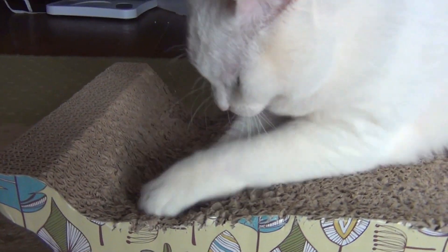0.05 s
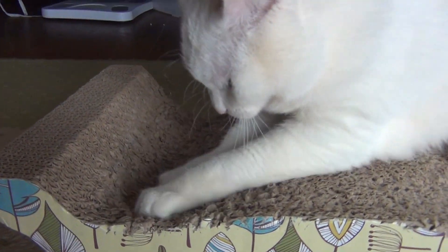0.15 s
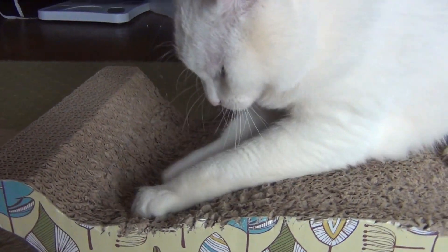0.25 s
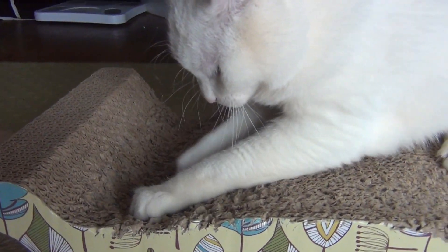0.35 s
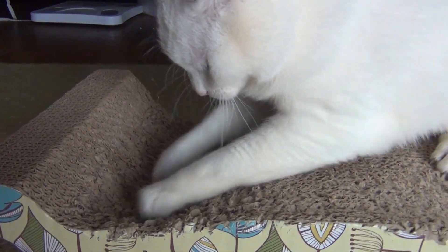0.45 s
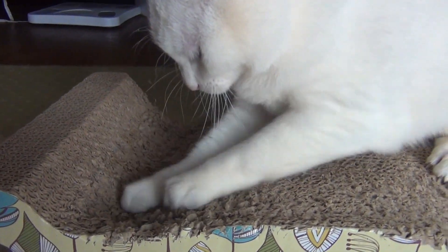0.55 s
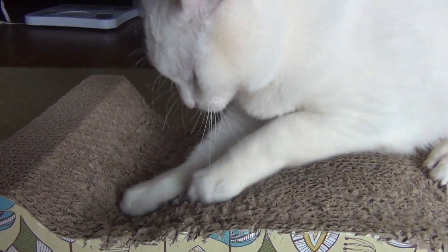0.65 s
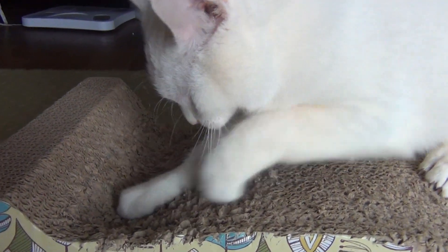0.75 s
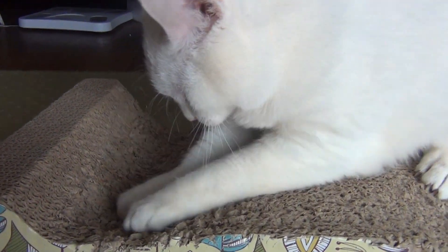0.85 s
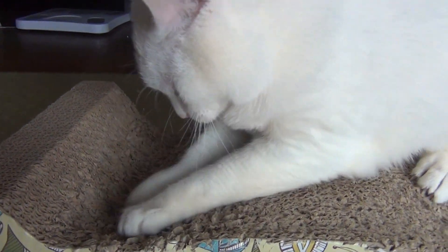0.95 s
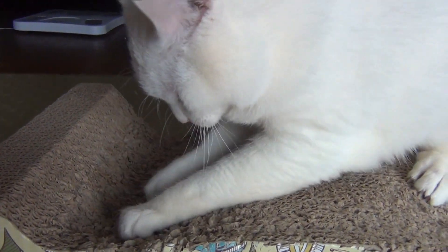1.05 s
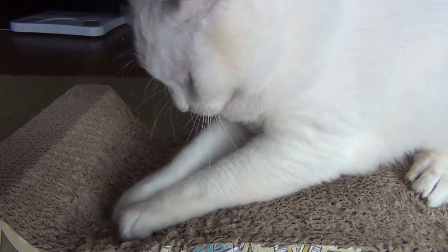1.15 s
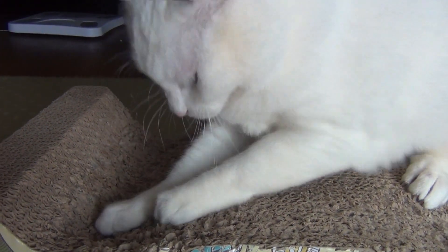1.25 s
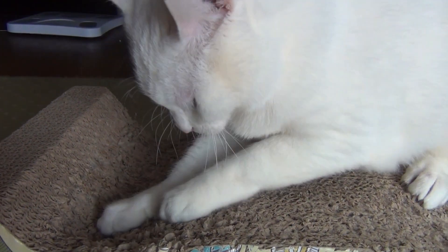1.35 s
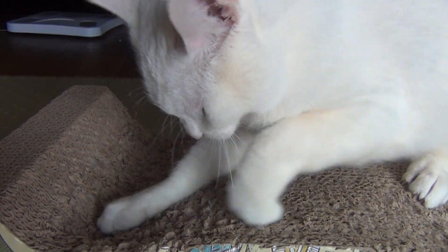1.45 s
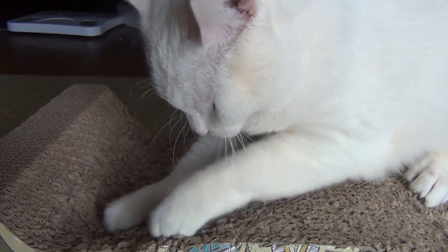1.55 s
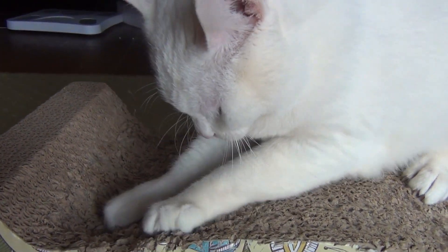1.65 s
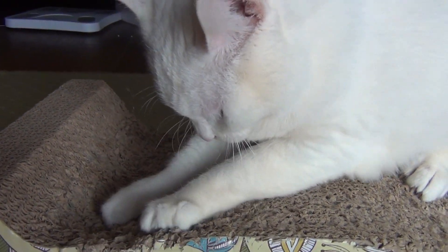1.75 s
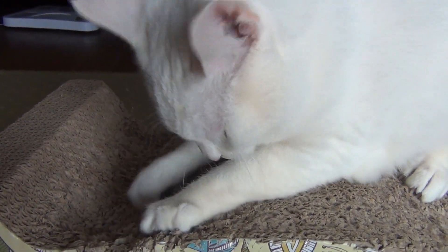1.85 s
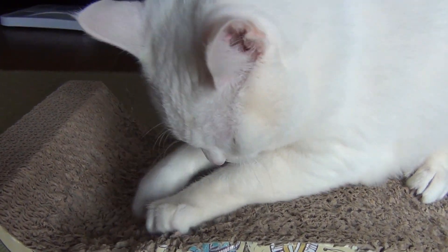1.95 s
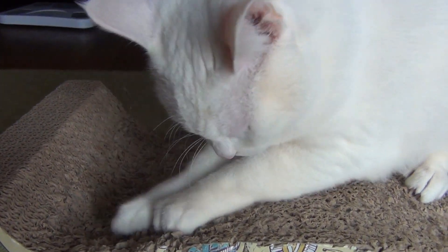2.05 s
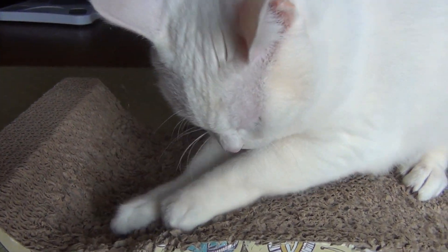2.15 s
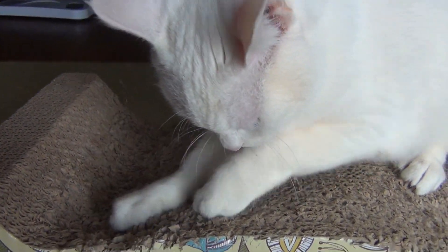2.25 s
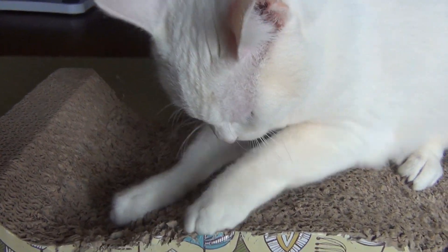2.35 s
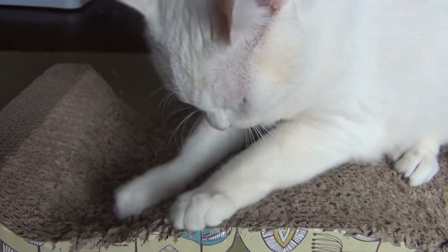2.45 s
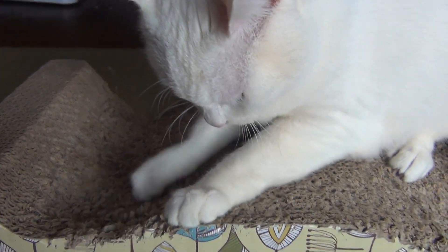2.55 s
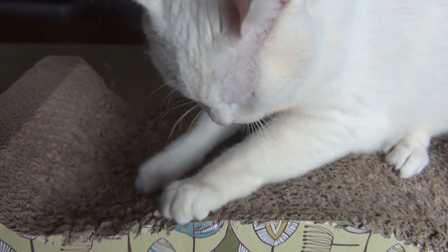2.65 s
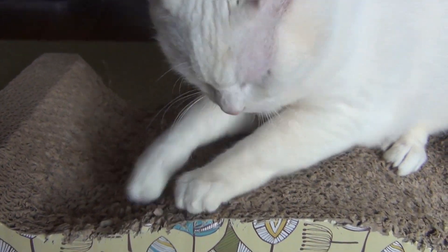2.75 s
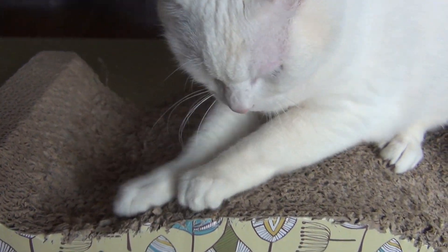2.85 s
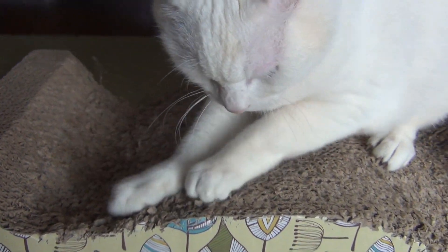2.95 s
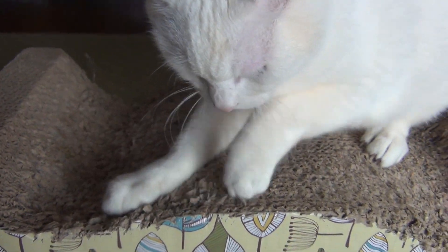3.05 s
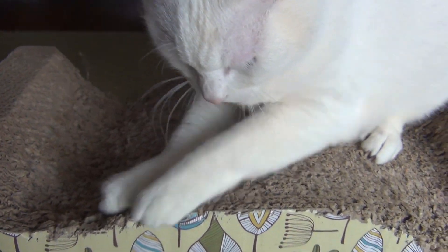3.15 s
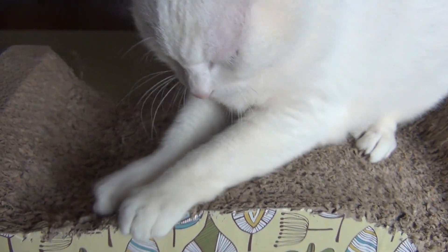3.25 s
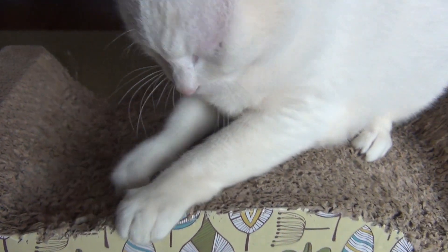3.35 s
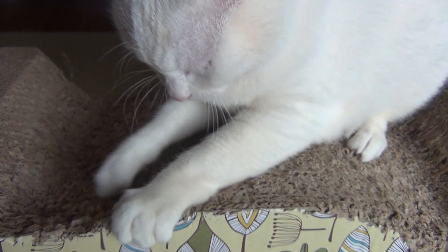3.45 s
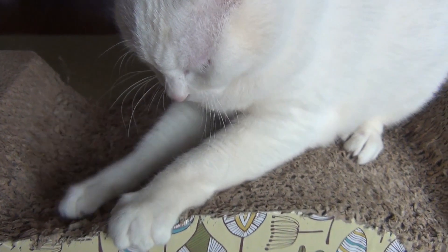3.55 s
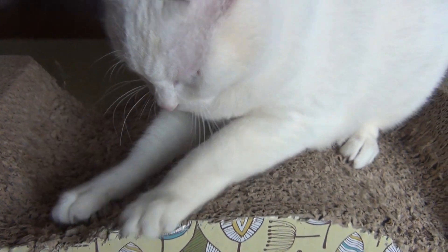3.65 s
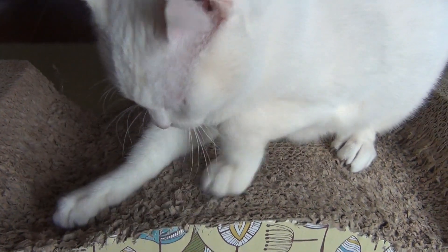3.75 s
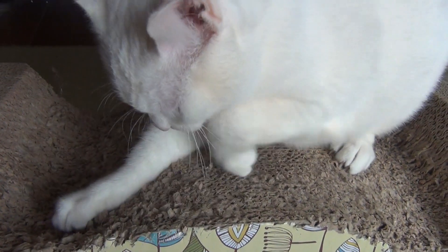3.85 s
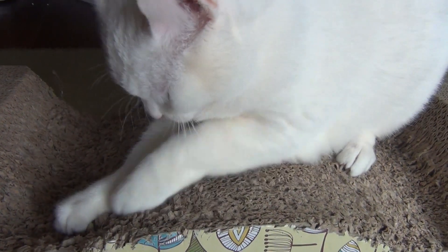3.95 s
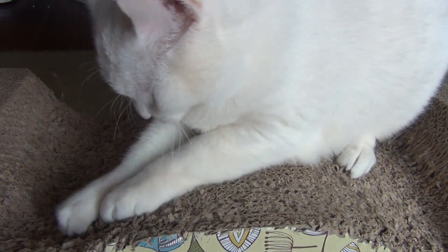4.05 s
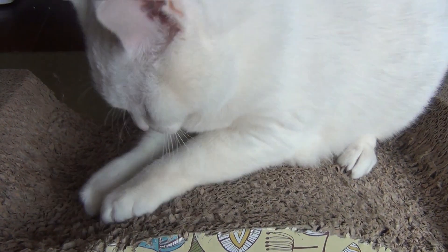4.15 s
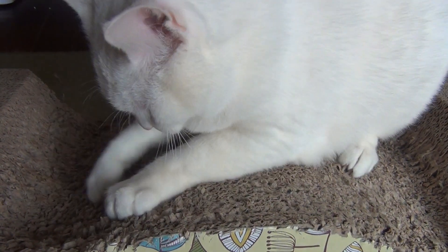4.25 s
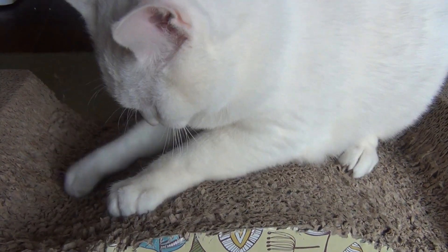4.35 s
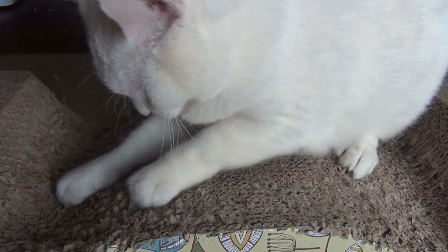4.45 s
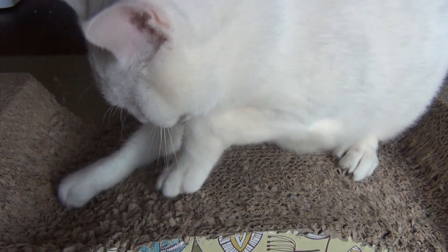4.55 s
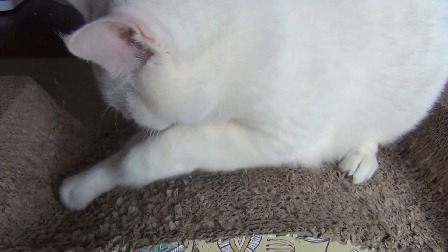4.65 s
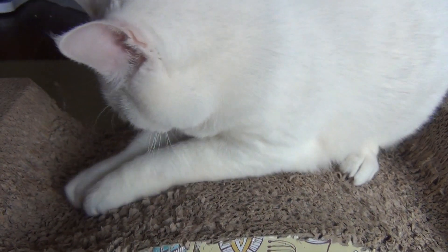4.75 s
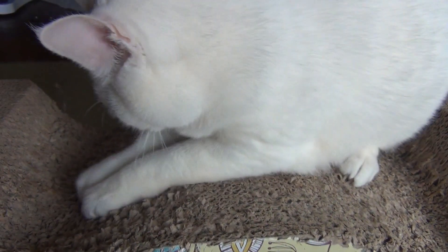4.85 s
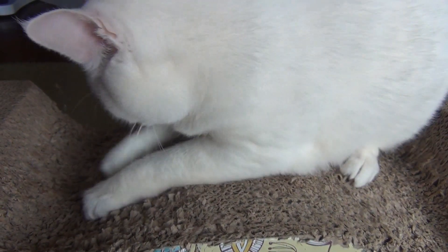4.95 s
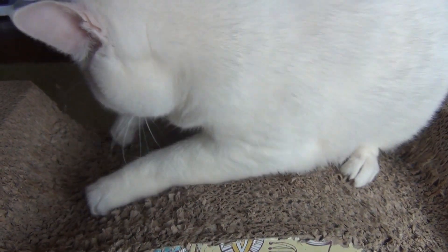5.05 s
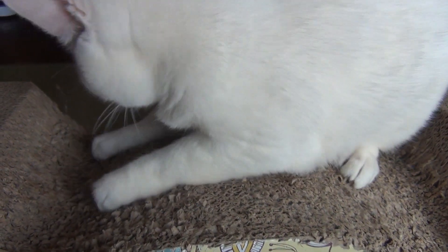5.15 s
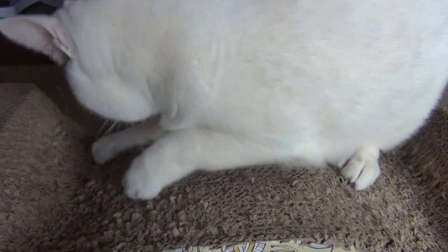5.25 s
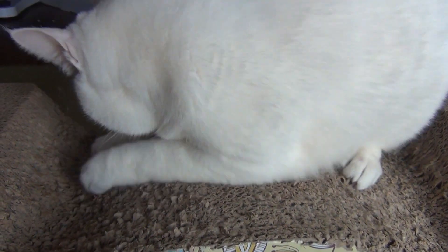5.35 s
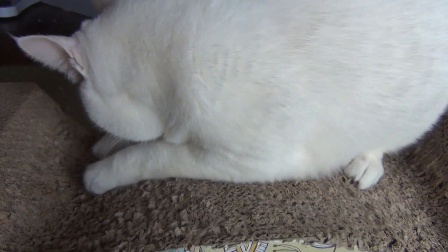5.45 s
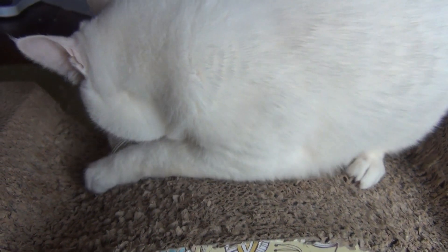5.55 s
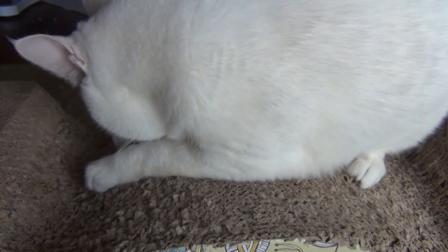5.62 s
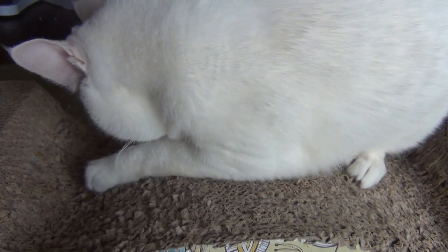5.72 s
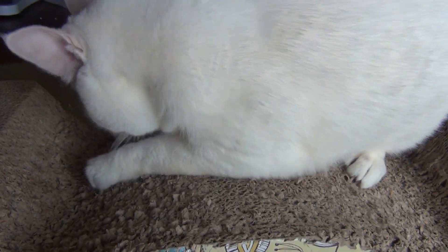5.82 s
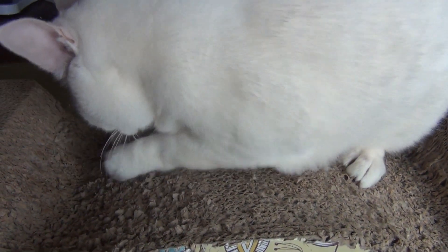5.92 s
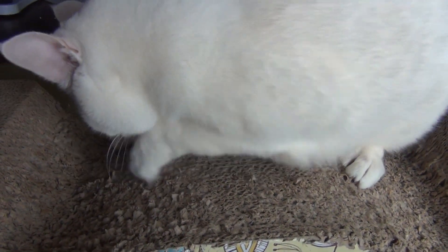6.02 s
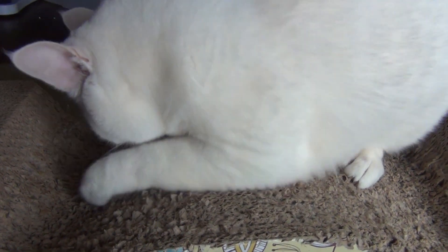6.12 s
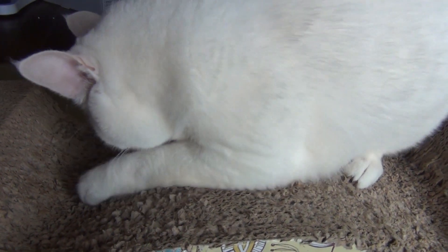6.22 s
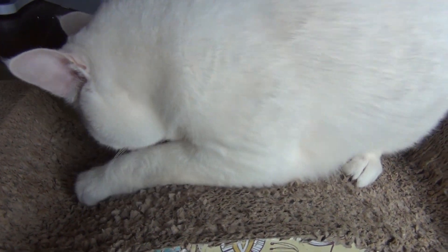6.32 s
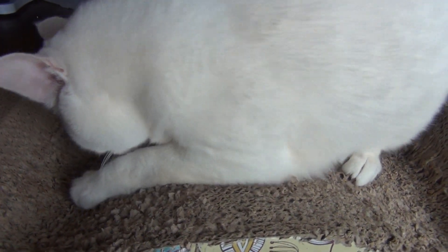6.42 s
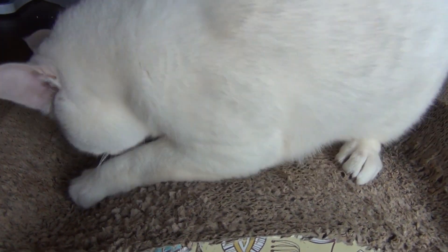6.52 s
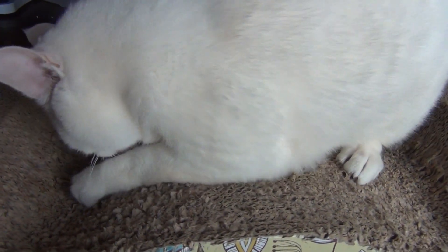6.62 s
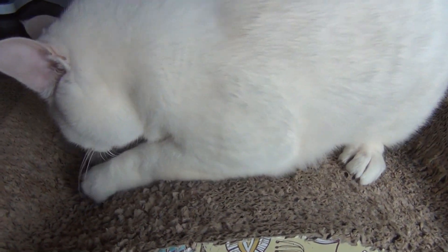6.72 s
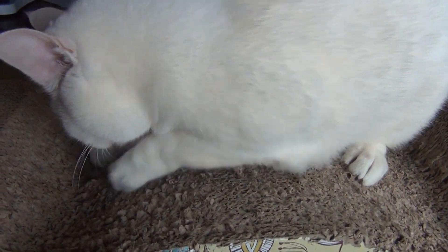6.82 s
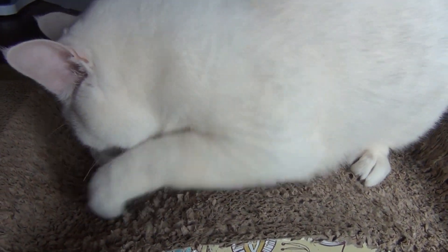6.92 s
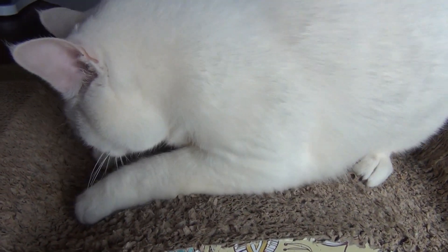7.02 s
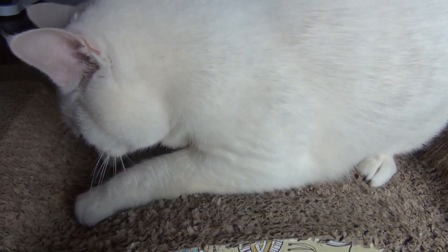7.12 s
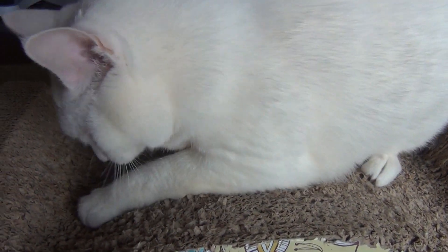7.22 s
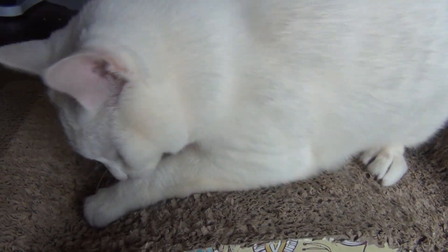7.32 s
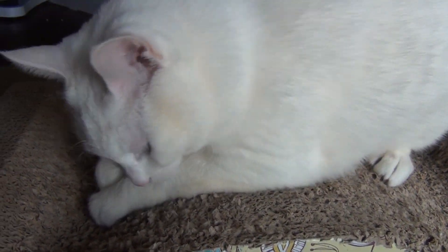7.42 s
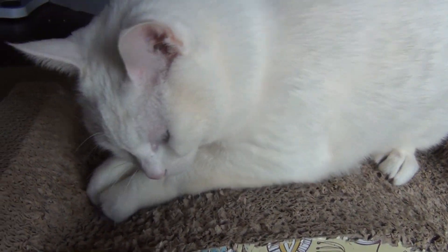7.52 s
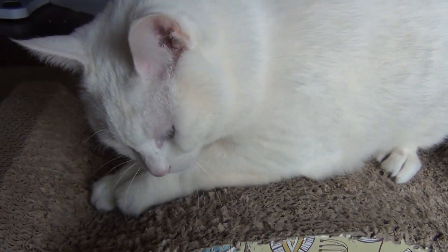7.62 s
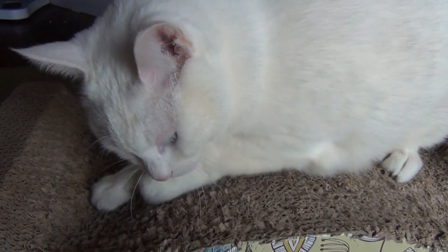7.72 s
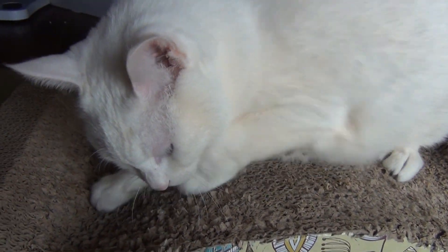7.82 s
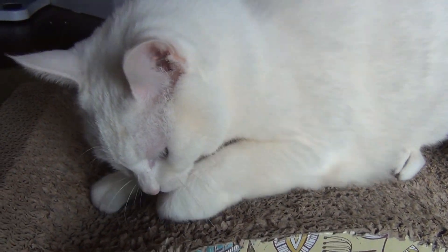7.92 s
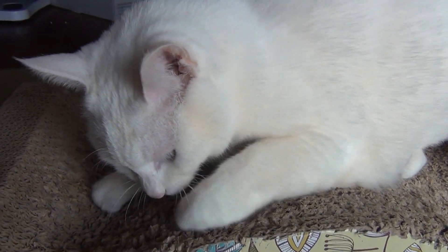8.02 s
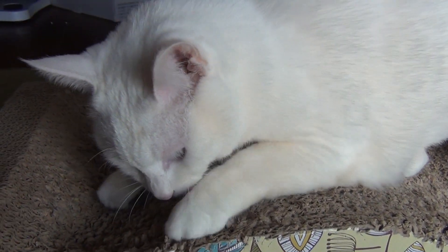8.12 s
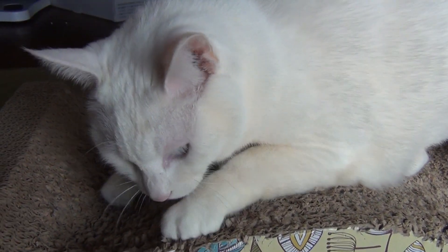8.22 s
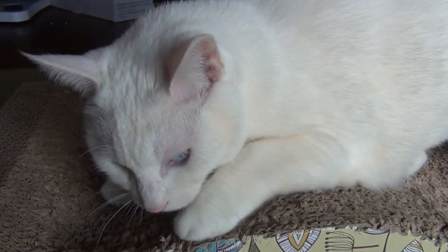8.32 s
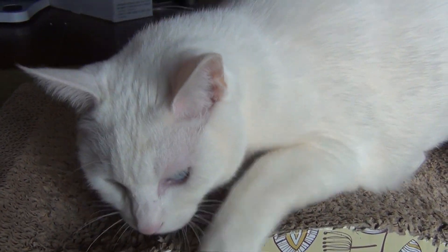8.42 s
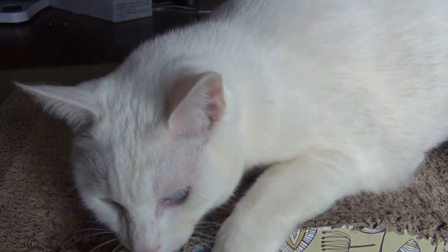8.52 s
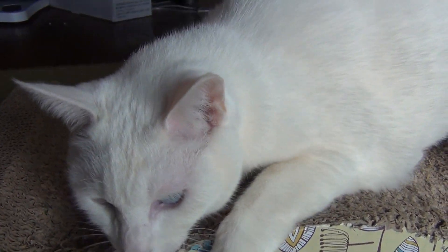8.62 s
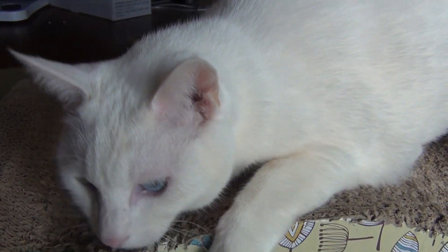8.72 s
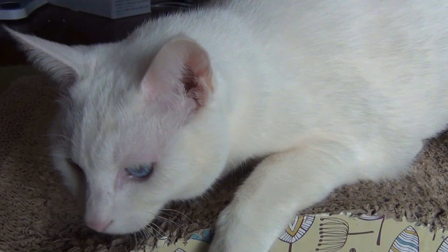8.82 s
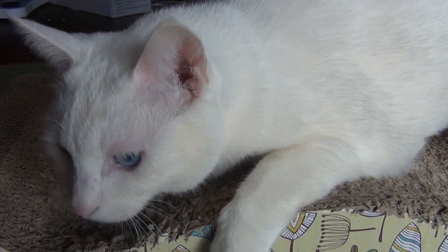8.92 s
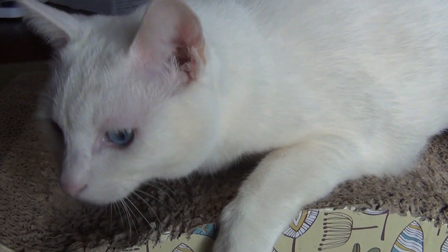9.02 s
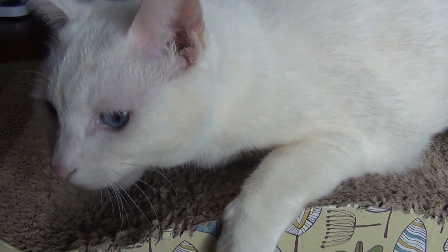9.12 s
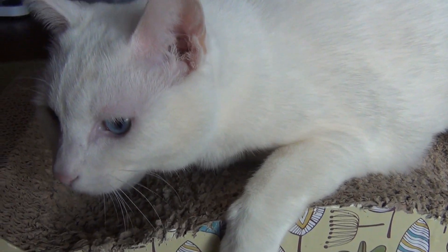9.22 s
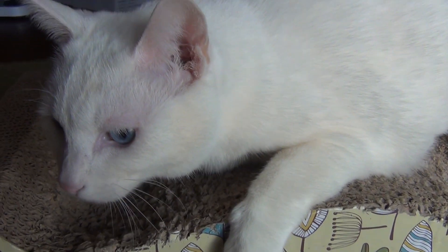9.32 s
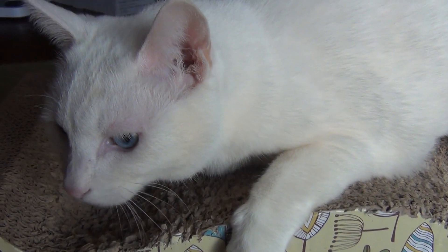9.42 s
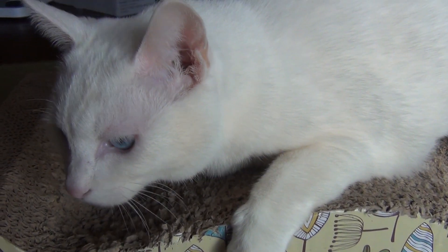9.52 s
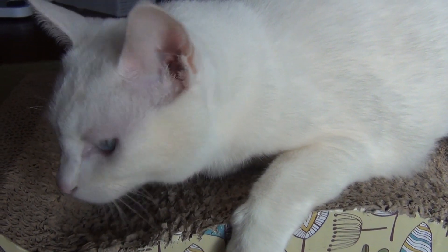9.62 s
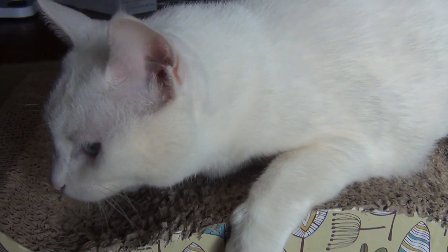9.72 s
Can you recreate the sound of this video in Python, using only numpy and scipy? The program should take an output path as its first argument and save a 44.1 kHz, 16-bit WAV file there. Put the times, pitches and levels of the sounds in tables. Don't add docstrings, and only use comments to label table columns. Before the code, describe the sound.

A quiet indoor room with very short reverberation and a faint steady hum; the microphone is close. From 0 to 0.8 s a cat's claws rake corrugated cardboard in quick succession: hard, hollow, dry pops mixed with papery tearing. After lighter snags, strong double pops come near 1.1 s, and the loudest single ones at 1.35 and 1.92 s. Around 2.4 to 2.9 s more catches follow, ending in a bright, sharp fibre snap at 2.85. From 3 to 5 s strokes are softer, with crackles, rasps, thumps of the board and pops near 3.45, 4.2 and 4.6. From 5 to 7 s there are small nicks, dull slow tears and soft paw shifts. A clear pop at 6.85 and a stronger one at 7.36 stand out. Light scrapes fade by 8 s; then barely audible ticks and brushing to about 8.7, and almost only hum, with one minute tick near 9.6.

```python
import sys
import numpy as np
from scipy import signal
from scipy.fft import rfft, irfft
from scipy.io import wavfile
from scipy.ndimage import uniform_filter1d, minimum_filter1d

SR = 44100
rng = np.random.default_rng(int(sys.argv[2]) if len(sys.argv) > 2 else 0)


def linear_from_db(decibels):
    return 10 ** (np.asarray(decibels, float) / 20)


def store_wav(level_fs):
    pcm = np.round(np.clip(np.atleast_2d(level_fs), -1, 1) * 32767)
    wavfile.write(sys.argv[1], SR, pcm.T.astype(np.int16))


N = 430853

# (frequency [Hz], level [dB per Hz])
FIBRE_SPECTRUM = [(1200, -34), (2400, 1.5), (3200, 7.5), (5000, 2), (7000, 4), (9500, 8), (12000, 2),
                  (16000, -7.5)]
# (frequency [Hz], side over mid [dB])
ROOM_WIDTH = [(100, -19), (300, -8), (800, -2), (1400, -4), (2400, -11), (6000, -36)]


def evened(x):
    return x / np.sqrt(np.mean(x ** 2) + 1e-20)


def peaked(x):
    return x / abs(x).max()


def read(points, hz):
    f, value = np.transpose(points)
    return np.interp(np.log(hz + 1), np.log(f + 1), value)


def stereo(mid, side):
    return np.array([mid + side, mid - side])


def colour(points, size=2048):
    log_gain = np.log(linear_from_db(read(points, abs(np.fft.fftfreq(size, 1 / SR)))))
    h = np.fft.ifft(np.exp(np.conj(signal.hilbert(log_gain)))).real[:size // 2]
    return h / np.linalg.norm(h)


def ring(modes, size=4410):
    t = np.arange(size) / SR
    h = np.zeros(size)
    for hz, width_hz, db in modes:
        h += linear_from_db(db) * np.exp(-np.pi * width_hz * t) * np.sin(2 * np.pi * hz * t)
    return h / np.linalg.norm(h)


def grains(shape, per_s, spread_db):
    hit, size, sign = rng.random((3, *shape))
    strike = np.clip((per_s / SR - hit) * SR / 60, 0, 1)
    return strike * linear_from_db(-spread_db * np.log(size + 0.0012)) * np.sign(sign - .5)


def claws():
    # (time [s], peak [dB], cell pitch [Hz], board thump [dB rel], paper snap [dB rel])
    pops = [(0.081, -9.5, 1250, -23, -25), (0.191, -10.5, 1980, -16, -28), (0.336, -13, 1280, -25, -48.5),
            (0.414, -17.5, 880, -39.5, -27), (0.486, -10.5, 880, -41.5, -28), (1.076, -16, 1300, -22, -27),
            (1.093, -13, 960, -50, -39), (1.3462, -3.5, 1700, -31.5, -27), (1.682, -23, 1710, -26, -17),
            (1.805, -20, 1240, -30.5, -30), (1.924, -3.5, 1350, -31, -34.5), (2.4, -20, 1730, -21, -17.5),
            (2.566, -21, 850, -11, -15), (2.649, -11, 1000, -11, -27.5), (2.845, -18.5, 730, -18, -9),
            (3.454, -21.5, 850, -8, -9.5), (4.121, -19.5, 825, -10.5, -27.5), (4.228, -17.5, 1290, -8, -17),
            (4.579, -19.5, 940, -28, -56), (4.825, -26.5, 930, -44, -20.5), (5.33, -32.5, 694, -7.5, -10.5),
            (6.851, -15, 885, -14.5, -36), (7.243, -27, 900, -8, -28), (7.361, -22.5, 867, -45, -41)]
    # (time [s], peak [dB], cell pitch [Hz], board thump [dB rel], paper snap [dB rel])
    tears = [(0.04, -30, 1280, -23, -9), (0.275, -26, 1940, -17, -13.5), (0.582, -23.5, 842, -19.5, -14),
             (0.664, -33.5, 665, -17, -10.5), (0.739, -22.5, 1220, -13, -15),
             (0.792, -24.5, 930, -14.5, -16.5), (1.151, -25.5, 705, -13, -12.5),
             (2.296, -29, 900, -13, -6.5), (3.099, -31.5, 780, -5, -2), (3.169, -36, 800, 2.5, -5.5),
             (3.795, -24.5, 468, -9.5, -7.5), (3.942, -30.5, 600, -18.5, -15),
             (4.381, -26, 1020, -13, -21.5), (4.543, -33.5, 658, -23, -10.5), (5.612, -34.5, 586, -5, -17),
             (5.768, -29, 850, -22.5, -19.5), (5.966, -25, 790, -14, -17), (6.034, -25, 583, -42.5, -16),
             (6.137, -32, 483, -13, -10), (6.553, -23.5, 660, -4, -21), (6.718, -30, 556, -19, -32),
             (6.965, -28.5, 570, -35, -12.5), (7.722, -29.5, 1180, -8.5, -20.5),
             (7.874, -31.5, 804, -20, -13)]
    # (time [s], peak [dB], cell pitch [Hz], board thump [dB rel])
    trails = [(0.187, -19.5, 1200, -5.5), (0.205, -18.5, 807, -11.5), (0.218, -17.5, 999, -16),
              (0.227, -23.5, 1240, -31), (0.574, -20, 991, -10.5), (0.652, -21.5, 861, -16.5),
              (0.743, -30.5, 859, -22), (0.808, -35, 557, -1.5), (1.084, -11.5, 1280, -24.5),
              (1.355, -17, 900, -4), (1.673, -35, 902, -11), (1.931, -23.5, 700, 4),
              (1.943, -25.5, 829, -6.5), (2.39, -27, 743, -13), (2.555, -33.5, 840, -13),
              (2.574, -44, 630, 1), (2.851, -12.5, 781, -8), (2.868, -45.5, 738, 18.5),
              (3.46, -19.5, 700, -12), (3.484, -27, 900, -10.5), (3.797, -26, 649, 3),
              (4.241, -21, 1210, -7), (4.531, -23.5, 875, -13), (4.817, -31.5, 638, -7),
              (5.315, -20.5, 877, -25.5), (5.34, -36, 641, 7.5), (5.63, -33, 729, -3.5),
              (5.78, -36, 552, 1.5), (5.98, -32.5, 641, -5), (6.576, -33.5, 452, -29),
              (7.251, -33, 643, -9.5), (7.364, -13, 767, -3)]
    # (time [s], peak [dB], cell pitch [Hz], paper snap [dB rel])
    nicks = [(0.855, -23, 1888, -28), (0.96, -27, 1230, -19), (1.21, -25.5, 1210, -31.5),
             (1.308, -27.5, 1647, -21), (1.523, -31, 802, -14), (1.557, -35, 541, -23),
             (1.644, -29.5, 560, -18), (2.04, -37, 850, -5), (2.177, -31.5, 622, -10),
             (2.439, -33.5, 743, -15.5), (3.612, -37, 563, -23), (4.0, -46.5, 665, -22),
             (4.932, -23.5, 1480, -23.5), (4.997, -29.5, 1570, -21.5), (5.083, -24, 738, -24),
             (5.152, -29, 874, -31), (5.2, -24, 899, -16), (5.275, -34, 942, -10), (5.418, -38, 897, -17),
             (5.54, -27.5, 865, -26.5), (5.844, -36, 549, -20), (5.906, -28, 1660, -17.5),
             (6.071, -45.5, 706, -11), (6.278, -26.5, 1190, -20), (6.469, -28, 900, -19.5),
             (6.792, -32, 562, -29), (6.897, -33, 576, -33), (7.044, -36.5, 575, -25.5),
             (7.481, -32.5, 918, -22), (7.544, -35.5, 560, -21)]
    # (time [s], treble peak [dB], cell pop [dB rel])
    cracks = [(1.624, -44, -2.5), (2.029, -37, -6), (2.228, -42, -8.5), (2.2869, -35.5, -1.5),
              (2.739, -27, -15.5), (2.9947, -23, -13), (3.01, -29, -5), (3.2065, -43, 0.5),
              (3.265, -36, -4.5), (3.588, -35.5, -12), (3.596, -39.5, 1.5), (3.652, -39.5, -3.5),
              (3.705, -43, -25), (3.716, -43.5, -26.5), (3.781, -24.5, -19.5), (4.1914, -59.5, 11),
              (7.156, -62.5, 8.5), (7.7082, -45, 6), (7.811, -47.5, 1), (7.9052, -38, 0.5),
              (7.9312, -33.5, -1), (8.1597, -53, 8), (8.4639, -46, -31), (8.5372, -42, -7.5),
              (8.583, -36, -13.5), (9.5756, -55, -11.5)]
    pop_s, tear_s, trail_s, nick_s, crack_s = .008, 0.02, 0.017, 0.014, .012
    trail_snap_db, nick_thump_db = -23.5, -15
    crack_hz, crack_thump_db, crack_db = 900, -11, 6.5

    caught = [(*row, pop_s) for row in pops]
    caught += [(*row, tear_s) for row in tears]
    caught += [(*row, trail_snap_db, trail_s) for row in trails]
    caught += [(s, db, hz, nick_thump_db, snap_db, nick_s) for s, db, hz, snap_db in nicks]
    for s, db, pop_db in cracks:
        length_s = crack_s * linear_from_db(.3 * (pop_db + 5.0))
        caught.append((s, db + pop_db + crack_db, crack_hz, crack_thump_db, -pop_db - 11, length_s))
    return caught


def paper_body(pitch_hz, thump_db):
    # (frequency [Hz], width [Hz], level [dB])
    cell_modes = [(590, 6.7, -30), (608, 40, -33), (874, 52, 11), (1180, 80, -2.5), (1240, 100, 16),
                  (1529, 69, 24.5), (1730, 13, 16.5)]
    # (frequency [Hz], width [Hz], level [dB])
    board_modes = [(325, 45, 0), (280, 55, -9), (420, 70, -9)]
    least_width_hz = 110
    detune = rng.uniform(-0.66, 1, (len(cell_modes), 2))
    cells = []
    for (f, width_hz, db), (a, b) in zip(cell_modes, detune):
        off_pitch_db = 13.0 * abs(np.log2(f / pitch_hz))
        cells.append((f * (1 + 0.084 * a), max(width_hz, least_width_hz), db + 7.0 * b - off_pitch_db))
    board = [(f * (1 + .06 * a), width_hz, db + 5.0 * b)
             for (f, width_hz, db), (a, b) in zip(board_modes, detune[::-1])]
    cell = ring([(pitch_hz, .45 * pitch_hz, 0)])
    pop = peaked(signal.fftconvolve(cell, cell)[:len(cell)]) + linear_from_db(1) * peaked(ring(cells))
    body = peaked(pop) + linear_from_db(thump_db + 0.5) * peaked(ring(board))
    claw = signal.windows.hann(17)
    return np.convolve(body, claw / claw.sum())


def shred_spectrum(snap_db):
    lumps = rng.uniform(-1, 1, len(FIBRE_SPECTRUM))
    tilt_db = 0.33 * (snap_db - .5001)
    return [(f, db + 4.5 * a + tilt_db * np.log2(f / 3500)) for (f, db), a in zip(FIBRE_SPECTRUM, lumps)]


def slip_train(t, lead, peak_db, length_s, rise_s, fade_in):
    strain_db, strain_s = -13, 0.008
    fade = np.exp(np.where(t < 0, t / rise_s, -t / length_s))
    fade = np.maximum(fade, linear_from_db(strain_db) * np.exp(t / strain_s) * (t < 0) * fade_in)
    slips = np.clip(grains((len(t),), per_s=1300, spread_db=3.5) * linear_from_db(-14), -.55, .55)
    slips *= min(1, linear_from_db(-.3 * (peak_db + 16)))
    slips[lead] = min(1, (.008 / length_s) ** 0.55, linear_from_db(0.27 * (peak_db + 7.5)) + 0.3)
    slips[lead] *= linear_from_db(-7 * np.clip((peak_db + 27) / 6, 0, 1))
    return slips * fade


def catches():
    # (frequency [Hz], level [dB per Hz])
    tick_spectrum = [(500, -36), (1800, 9), (4500, 6.5), (9000, -22.5)]
    tick, tick_db = colour(tick_spectrum), 12
    lag_s = 0.0017
    fray_s = .005
    out, size, lead = np.zeros(N + SR), 3600, 600
    t = (np.arange(size) - lead) / SR
    for s, peak_db, hz, thump_db, snap_db, length_s in claws():
        length_s = max(length_s, .002)
        rise_s = 0.00043 + 22 * length_s ** 2
        slips = slip_train(t, lead, peak_db, length_s, rise_s, np.clip((t - t[0]) / .003, 0, 1))
        fray = np.exp(np.where(t < 0, t / max(rise_s, fray_s), -1.2 * t / length_s))
        fray = fray * np.clip((t - t[0]) / 0.0025, 0, 1)
        torn = slips * linear_from_db(3) + linear_from_db(-16) * rng.standard_normal(size) * fray
        snap = linear_from_db(snap_db + 11.0) * signal.fftconvolve(torn, colour(shred_spectrum(snap_db)))
        sound = signal.fftconvolve(slips, paper_body(hz, thump_db))
        sound[:len(snap)] += snap
        tick_gain = linear_from_db(snap_db + tick_db) * min(.008 / length_s, 1) * linear_from_db(.3 * (peak_db + 26.5))
        sound[lead:lead + len(tick)] += tick_gain * tick
        at = round((s + lag_s) * SR) - lead
        out[at:at + len(sound)] += linear_from_db(peak_db) * sound
    return signal.sosfilt(signal.butter(4, 245, "high", fs=SR, output="sos"), out[:N])


def knocks():
    # (time [s], peak [dB], pitch [Hz])
    cave_ins = [(0.0814, -9, 1663), (0.1937, -12, 1760), (0.2065, -17.5, 1474), (0.2091, -16.5, 1250),
                (0.2195, -21.5, 1260), (0.223, -20.5, 1300), (0.3388, -17.5, 1260), (0.4171, -25, 1160),
                (0.4883, -16, 1120), (0.5806, -18, 1177), (0.6561, -22, 1220), (1.0795, -12.5, 1330),
                (1.0822, -19, 1510), (1.0872, -15.5, 1110), (1.0959, -5.5, 1347), (1.3429, -20.0, 1375),
                (1.3498, -3.5, 1480), (1.3561, -17.5, 1050), (1.808, -22.5, 1377), (1.9256, -4, 1360),
                (1.931, -18.5, 1290), (1.9344, -22, 1267), (2.2933, -17.5, 1720), (2.4021, -21.5, 1725),
                (2.6501, -7, 1430), (2.6534, -32, 1050), (2.6562, -29, 1210), (2.6595, -27.5, 1450),
                (2.8438, -19.5, 1325), (2.847, -11, 1176), (2.8498, -20.5, 1380), (2.8538, -17.5, 850),
                (2.8624, -23.5, 1290), (3.4552, -20, 1197), (3.4625, -27, 1120), (3.4749, -25, 1014),
                (3.4849, -24.5, 954), (3.7933, -24.5, 1260), (3.7964, -19.5, 1080), (4.123, -25.5, 1160),
                (4.2294, -16, 1650), (4.2329, -26, 1400), (4.2411, -20.5, 1344), (4.5338, -30.5, 1240),
                (4.5826, -13.5, 1160), (4.5853, -22.5, 980), (4.9338, -29, 1246), (5.0852, -25, 940),
                (5.211, -25.5, 1200), (5.3182, -26, 1600), (5.3321, -24.5, 1130), (5.7797, -28.5, 950),
                (6.5584, -28, 875), (6.5645, -23.5, 838), (6.8521, -21.5, 1520), (6.8553, -27.5, 990),
                (7.2454, -32, 1200), (7.3632, -10, 1070), (7.3666, -14, 923), (7.8806, -27.5, 1310)]
    rise_cycles, fall_cycles = 0.43, 0.54
    out = np.zeros(N + SR)
    t = np.arange(-80, 300) / SR
    for k, (s, peak_db, hz) in enumerate(cave_ins):
        cycles = t * hz
        swell = np.exp(-.5 * (cycles / rise_cycles) ** 2)
        shape = np.where(t < 0, swell, np.exp(-cycles / fall_cycles))
        knock = shape * np.cos(2 * np.pi * cycles)
        knock = knock - shape * knock.sum() / shape.sum()
        out[round((s + t[0]) * SR):][:len(t)] += (-1) ** k * linear_from_db(peak_db) * knock
    return signal.sosfiltfilt(signal.butter(2, 2700, fs=SR, output="sos"), out[:N])


def snaps():
    # (time [s], peak [dB], pitch [Hz])
    breaks = [(0.0804, -20.5, 3600), (0.1872, -34.5, 5000), (0.194, -21.5, 3800), (0.2062, -25, 3940),
              (0.2222, -26.5, 3300), (0.2792, -31, 4200), (0.4875, -27.5, 3050), (0.5726, -27.5, 2980),
              (0.7326, -27, 2000), (0.7905, -32, 4000), (0.8575, -34.5, 2520), (1.161, -23, 4800),
              (1.309, -27, 1590), (1.3423, -31, 3490), (1.563, -34, 2995), (1.578, -34, 3003),
              (1.6275, -27.5, 1810), (1.6452, -29.5, 6350), (1.6755, -34, 3840), (1.9305, -34, 3370),
              (2.2875, -29, 2000), (2.2925, -30.5, 3050), (2.3918, -34, 3400), (2.4008, -19.5, 4000),
              (2.6495, -21, 3760), (2.7405, -21.5, 5000), (2.759, -33, 8500), (2.7786, -33, 4000),
              (2.8436, -6, 4500), (2.8497, -13, 6750), (2.8762, -35, 4810), (2.9973, -23.5, 5860),
              (3.0988, -26, 4420), (3.461, -19.5, 4000), (3.589, -35, 8000), (3.5995, -32, 4480),
              (3.7175, -37.5, 7500), (3.7925, -22.5, 7500), (3.7935, -18.5, 420), (4.229, -23, 3450),
              (5.155, -31, 3000), (5.2015, -41.5, 3800), (5.3226, -27, 3710), (5.538, -40.5, 3200),
              (5.6062, -31, 1100), (5.907, -34.5, 3520), (6.034, -29, 1330), (6.277, -35, 2014),
              (6.577, -35.5, 2500), (6.717, -37, 3270), (7.882, -38, 3250), (7.907, -36, 6420),
              (7.9333, -25, 5430), (8.115, -51, 3500), (8.578, -43, 4500), (9.577, -50, 4490)]
    out = np.zeros(N + SR)
    for s, peak_db, hz in breaks:
        width_hz = .3 * hz
        crack = ring([(hz, width_hz, 0), (1.65 * hz, width_hz, -13), (.6 * hz, width_hz, -4)], size=300)
        crack = crack * np.clip(np.arange(len(crack)) * hz / SR, 0, 1)
        out[round(s * SR):][:len(crack)] += linear_from_db(peak_db) * peaked(crack)
    return signal.sosfilt(signal.butter(2, 200, "high", fs=SR, output="sos"), out[:N])


def drag():
    # (time [s], pressure [dB], fibre shredding [dB rel])
    strokes = [(0.0, -49, -17.5), (0.68, -41, -17), (0.95, -48, -22), (1.49, -46.5, -9), (1.69, -51.5, -12),
               (3.01, -48.5, -5), (3.31, -59.5, -1.5), (4.51, -51, -15.5), (4.88, -55.5, -11.5),
               (5.17, -46.5, -15.5), (5.39, -53, -21.5), (6.03, -53, -11), (6.42, -58.5, -18),
               (6.86, -45.5, -14.5), (7.11, -60, -13), (7.55, -49.5, -21.5), (8.41, -66.5, -1),
               (8.8, -69.5, -12.5)]
    # (start [s], length [s], fibre [dB], rub [dB rel])
    swipes = [
        (2.711, 0.12, -44.5, -19),
        (2.829, 0.056, -33.5, -10),
        (2.988, 0.058, -43, -3.5),
        (3.506, 0.079, -54, -1),
        (3.755, .19, -45.5, -27),
        (4.507, 0.17, -55, 2),
        (8.103, 0.15, -71.5, 12),
        (8.257, 0.09, -69, 1),
        (8.434, 0.25, -70.5, -8.5),
    ]
    # (start [s], length [s], rub [dB])
    rasps = [(0, 0.044, -43.5), (0.359, 0.077, -45.5), (0.497, 0.022, -48), (0.872, .05, -51),
             (1.194, 0.045, -42), (1.33, 0.022, -32.5), (1.39, 0.11, -53), (1.499, 0.073, -49),
             (1.667, 0.019, -40.5), (1.966, 0.062, -49.5), (2.052, 0.099, -49), (2.155, 0.055, -43.5),
             (2.433, 0.024, -44), (2.644, 0.074, -41.5), (3.149, 0.032, -45), (3.83, 0.1, -55),
             (4.103, 0.044, -46), (4.232, 0.095, -60.5), (4.679, 0.038, -53), (5.009, 0.029, -43),
             (5.063, 0.061, -53), (5.124, 0.073, -47), (5.255, 0.032, -48.5), (5.6, 0.031, -47),
             (6.264, 0.03, -46.5), (6.737, 0.021, -49.5), (7.012, 0.056, -53.5), (7.354, .01, -32.5),
             (7.394, 0.054, -58.5), (7.636, 0.029, -48.5), (7.78, 0.11, -57.5), (7.902, 0.039, -46.5),
             (8.162, 0.039, -55)]
    # (frequency [Hz], level [dB per Hz])
    rub_spectrum = [(55, -38.5), (110, -5.5), (205, -8), (320, 3), (420, -7.5), (650, -1), (880, -0.5),
                    (2050, -6), (2550, -11), (6000, -24.5)]
    rasp_fibre_db = -28.5
    light_db, firm_db, clump_db = -70, -52, 2.4

    t = np.arange(N) / SR
    s, pressure_db, shred_db = np.transpose(strokes)
    press_db = np.interp(t, s, pressure_db, right=-120)
    firm = np.clip((press_db - light_db) / (firm_db - light_db), 0, 1)

    start, length, swipe_db, rub_db = np.transpose(swipes)[:, :, None]
    swipe = linear_from_db(swipe_db) * np.sin(np.pi * np.clip((t - start) / length, 0, 1) ** 0.46)
    start, length, rasp_db = np.transpose(rasps)[:, :, None]
    coarse_t = t[::32]
    rasp = linear_from_db(rasp_db) * np.sin(np.pi * np.clip((coarse_t - start) / length, 0, 1) ** .8)
    rasp = np.interp(t, coarse_t, rasp.sum(0))

    wander = uniform_filter1d(rng.standard_normal((2, N)), size=500)
    dull, bright = evened(uniform_filter1d(wander, size=500))
    rub = grains((N,), per_s=1900, spread_db=3.4)
    rub = evened(signal.oaconvolve(rub, colour(rub_spectrum, size=4096))[:N])
    fibre = grains((N,), per_s=9000, spread_db=2.6)
    fibre = evened(signal.oaconvolve(fibre, colour(FIBRE_SPECTRUM))[:N])

    rub_gain = linear_from_db(press_db - 3.5 + clump_db * firm * dull)
    rub_gain = rub_gain + (swipe * linear_from_db(rub_db)).sum(0) * linear_from_db(1.5 * dull) + rasp
    fibre_gain = linear_from_db(press_db + np.interp(t, s, shred_db)) + swipe.sum(0) + linear_from_db(rasp_fibre_db) * rasp
    return rub * rub_gain + fibre * fibre_gain * linear_from_db(1.2 * dull + 1.2 * bright)


def steps():
    # (time [s], peak [dB])
    landings = [(0.178, -43), (0.573, -47), (0.645, -52.5), (0.948, -55.5), (1.065, -44), (1.342, -49.5),
                (1.913, -39), (2.281, -55.5), (2.556, -55.5), (2.651, -54), (2.843, -44.5), (3.446, -47),
                (3.775, -54), (4.217, -51.5), (6.36, -60.5), (4.815, -53.5), (5.066, -48), (5.148, -51.5),
                (5.3, -51), (5.614, -47.5), (5.761, -48), (6.028, -49.5), (6.54, -45), (6.85, -52),
                (6.96, -55), (7.344, -42), (7.708, -50.5), (7.91, -50.5)]
    rise_s, fall_s, band_hz = 0.0017, 0.055, [62, 152]
    t = np.arange(N) / SR
    s, db = np.transpose(landings)
    since = np.maximum(t[::64, None] - s, 0)
    push = (linear_from_db(db - 4.5) * (1 - np.exp(-since / rise_s)) * np.exp(-since / fall_s)).sum(1)
    band = signal.butter(3, band_hz, "band", fs=SR, output="sos")
    low = signal.sosfilt(band, rng.standard_normal(N))
    return evened(low) * np.interp(t, t[::64], push)


def room(x):
    # (frequency [Hz], decay time t60 [s])
    decay = [(100, 0.048), (400, 0.025), (1500, 0.012), (4000, 0.11), (10000, 0.017)]
    hz, t, z = signal.stft(rng.standard_normal((2, SR // 2)), SR, nperseg=256)
    z = z * linear_from_db(-60 * t / read(decay, hz)[:, None])
    z = z * linear_from_db(np.array([0 * hz, read(ROOM_WIDTH, hz)]))[:, :, None]
    tail = signal.istft(z, SR, nperseg=256)[1]
    tail = np.pad(tail / np.linalg.norm(tail[0]), ((0, 0), (130, 0)))
    return stereo(*signal.oaconvolve(x[None], tail, axes=1)[:, :N])


def hum():
    # (frequency [Hz], level [dB per Hz])
    floor_spectrum = [(20, -15.5), (90, 0), (200, -1), (640, 3), (740, 2.5), (860, 10.5), (1050, 1),
                      (2400, -4.5), (5800, -8.5), (12000, -15)]
    level_db = -66.5
    hz = np.fft.rfftfreq(N, 1 / SR)
    mid, side = rfft(rng.standard_normal((2, N))) * linear_from_db(read(floor_spectrum, hz))
    side = side * linear_from_db(read(ROOM_WIDTH, hz) - 1.5)
    return linear_from_db(level_db) * evened(stereo(irfft(mid, N), irfft(side, N)))


def scene():
    board = drag() + steps() + snaps() + knocks() + catches()
    return board + linear_from_db(-11) * room(board) + hum()


def band_edges(x):
    # (frequency [Hz], gain [dB])
    response = [(9950, 0), (10150, -28), (11050, -28), (11250, -4), (12000, -4), (12200, -17), (14500, -19),
                (14800, -34), (15720, -33), (15820, -70)]
    hz = np.linspace(0, SR / 2, 1025)
    fir = signal.firwin2(2047, hz, linear_from_db(read(response, hz)), fs=SR)
    return signal.oaconvolve(x, fir[None], "same", axes=1)


def starve(x):
    hz, t, z = signal.stft(x, SR, nperseg=1024, noverlap=768)
    hz = hz[:, None]
    luck, stray, error = rng.standard_normal((3, *z.shape[1:]))
    luck = evened(uniform_filter1d(uniform_filter1d(luck, size=6, axis=0), size=16, axis=1))
    stray = evened(uniform_filter1d(uniform_filter1d(stray, size=30, axis=0), size=7, axis=1))

    power = uniform_filter1d(abs(z.mean(0)) ** 2, size=4, axis=1)
    near = uniform_filter1d(power, size=24, axis=0)
    total = power.sum(0) + 1e-12
    load = evened(np.gradient(uniform_filter1d(np.log(total), size=9)))
    busy = np.log(total)
    busy = evened(busy - uniform_filter1d(busy, size=90))
    level = uniform_filter1d(np.log10(total), size=60)
    above_floor = level - level.min()

    step = np.clip(.4 + 1.0 * luck + .3 * load, 0, 9) * np.clip((hz - 1500) / 1500, 0, 1)
    step = step * np.clip(.6 + .5 * above_floor, 0, 1.15)
    kept = np.clip(2 * (power / (near + 1e-20) - step) + 1, .04, 1)
    edge = uniform_filter1d(np.gradient(np.gradient(x.mean(0))) ** 2, size=48)
    crest = -minimum_filter1d(-edge, size=1024) / (uniform_filter1d(edge, size=1024) + 1e-20)
    crest = np.interp(t, np.arange(N) / SR, crest)
    kept = np.maximum(kept, np.clip(crest / 5 - 1, 0, 1))

    shelf_db = 9.0 * np.tanh(1.3 * stray[300] + .7 * load + 1.1 * busy)
    shelf_db = shelf_db * np.clip(2 * above_floor, 0, 1) * (hz > 12100)
    shelf_db = shelf_db + 5.0 * np.tanh(stray[200]) * (hz > 11000) * (hz < 12100)
    apart = linear_from_db(-10 - hz / 2500 + 17 * (hz > 10500)) * error * (stray > 1.1) * (hz > 1800)
    z = z * kept * linear_from_db(shelf_db) * np.array([1 + apart, 1 - apart])
    return signal.istft(z, SR, nperseg=1024, noverlap=768)[1][:, :N]


def band_limit(x):
    return signal.sosfilt(signal.butter(12, 15790, fs=SR, output="sos"), x)


def record(dry):
    mix = starve(band_edges(dry))
    return band_limit(mix)


dry = scene()
out = record(dry)
store_wav(out)
```